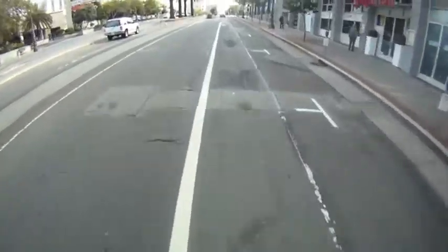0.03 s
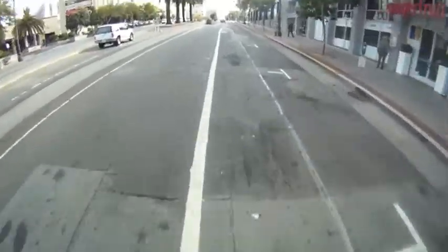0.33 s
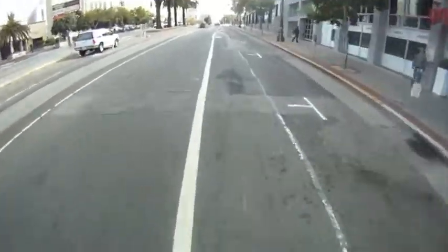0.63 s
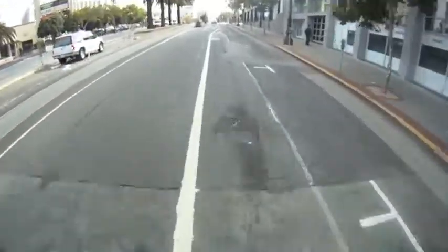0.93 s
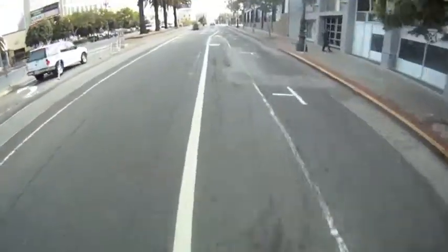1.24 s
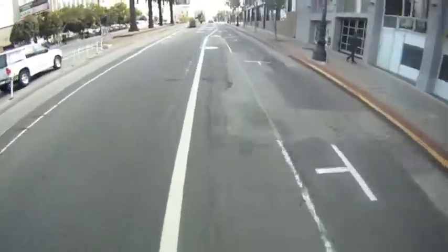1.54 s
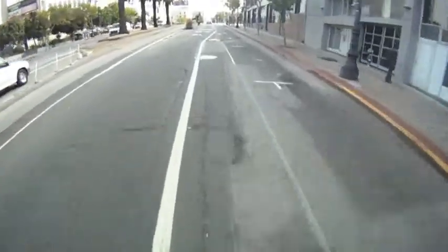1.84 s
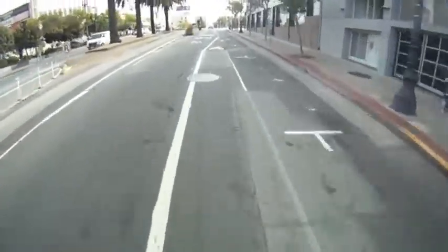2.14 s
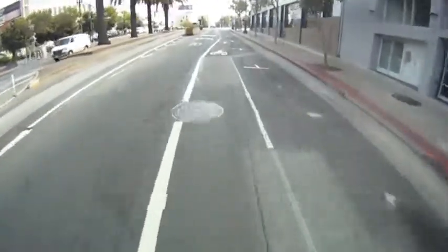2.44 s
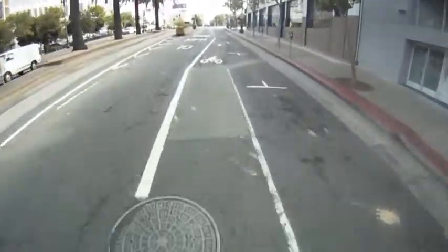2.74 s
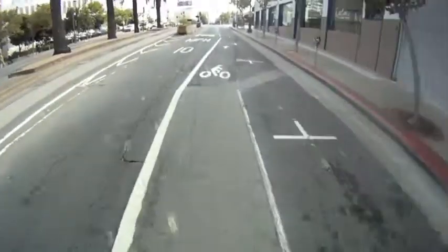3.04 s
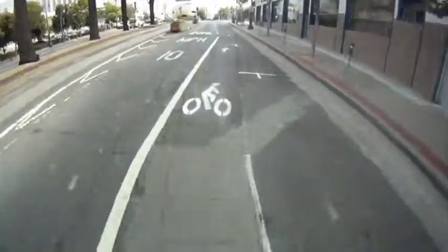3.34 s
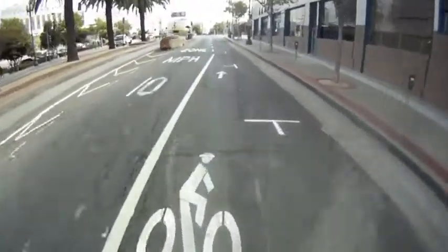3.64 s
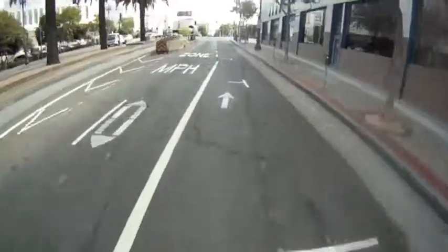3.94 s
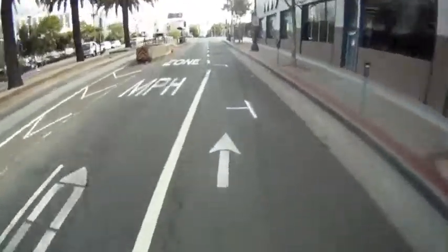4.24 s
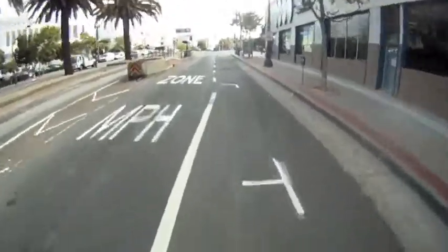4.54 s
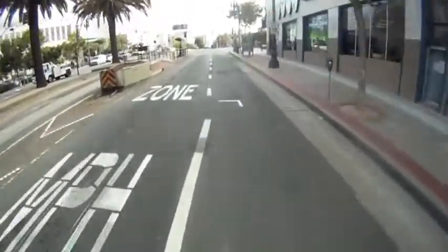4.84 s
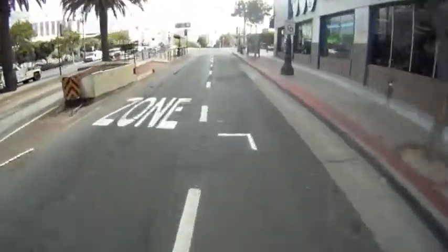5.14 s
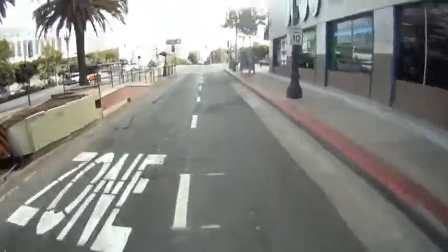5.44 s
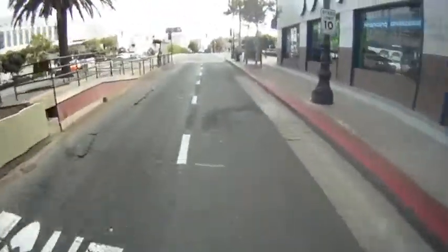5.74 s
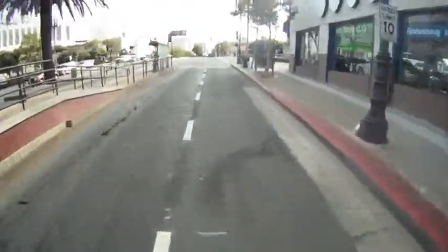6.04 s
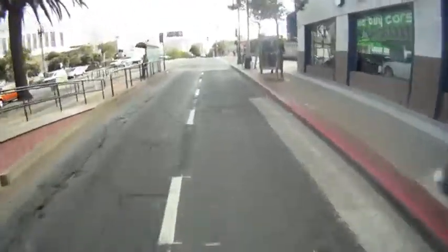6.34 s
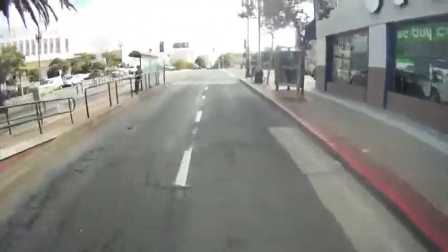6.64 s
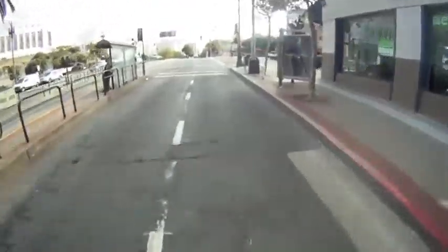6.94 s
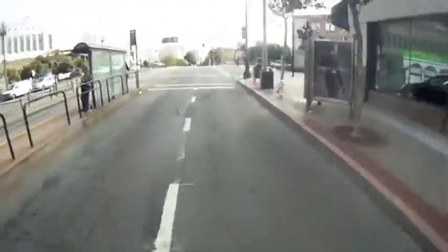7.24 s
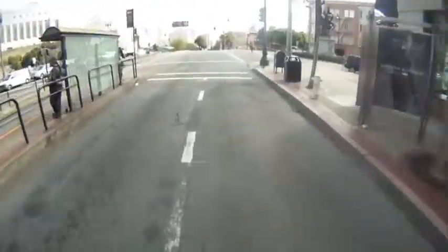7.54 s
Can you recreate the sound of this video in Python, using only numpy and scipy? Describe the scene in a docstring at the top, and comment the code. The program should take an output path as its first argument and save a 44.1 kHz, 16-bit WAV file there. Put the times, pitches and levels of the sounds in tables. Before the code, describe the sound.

Tyres on asphalt and rushing air sound boxy through a microphone enclosed on a bicycle's handlebar. The mount trembles with a deep rumble, and the uneven street keeps rocking it with low thumps, rattles and the odd tick of a loose part. In the second half, clusters of hard clacks ring the housing while the rolling noise gradually softens. Four hard jolts, one early and three later, each give a dull pop and short buzz on the right.

```python
"""A bicycle rolls down a city street with a camera in a closed housing on its handlebar.
From the start, tyre and air noise come through the housing while the mount trembles.
Bumps soon rock the mount with low thumps and rattles; at 0.8 s a hard one pops and buzzes on the right,
and a loose part ticks. From 3.9 s the mount also knocks against its stop, and two more hard jolts follow.
The tyre noise eases as the bicycle slows, and a last jolt comes at 7.3 s."""
import sys
import numpy as np
from scipy.fft import rfft, irfft, next_fast_len
from scipy.io import wavfile
from scipy.ndimage import map_coordinates

SR = 44100
rng = np.random.default_rng(int(sys.argv[2]) if len(sys.argv) > 2 else 0)


def master_out(mix):
    """Clip the mix to full scale and print it as 16-bit PCM to the path in sys.argv[1]."""
    frames = np.transpose(np.atleast_2d(mix))
    ceiling = np.clip(frames, -1, 1)
    pcm = np.round(ceiling * 32767).astype(np.int16)
    wavfile.write(sys.argv[1], SR, pcm)


N = 334278


def amp(db):
    """Turn decibels into a factor to multiply by."""
    return 10 ** (np.asarray(db) / 20)


def unit(x):
    """Scale a sound to an average (rms) level of 1."""
    return x / np.sqrt(np.mean(x ** 2) + 1e-20)


def curve(rows):
    """Join (time, value) points with straight lines, one value per sample."""
    return np.interp(np.arange(N) / SR, *np.transpose(rows))


def wobble(rate):
    """A smooth random curve through `rate` points a second."""
    return map_coordinates(rng.standard_normal(int(N * rate / SR) + 4), [np.arange(N) * rate / SR])


def filtered(x, response):
    """Multiply each frequency f in a sound by response(f)."""
    size = x.shape[-1]
    padded = next_fast_len(size + 8192)
    return irfft(rfft(x, padded) * response(np.fft.rfftfreq(padded, 1 / SR)), padded)[..., :size]


def coloured(x, spectrum):
    """Shape a sound's tone by (frequency, level) points, then scale it to level 1."""
    hz, db = np.transpose(spectrum)
    return unit(filtered(x, lambda f: amp(np.interp(np.log(f + 1), np.log(hz), db, right=-120))))


def resonance(f, hz, width):
    """How a part that rings at `hz` responds to frequency f."""
    return 1j * f * width / (hz * hz - f * f + 1j * f * width)


def add(track, s, sound):
    """Mix a sound into the track, starting at s seconds."""
    part = track[round(s * SR):]
    part[:len(sound)] += sound[:len(part)]


# How loud the tyres are along the ride: t/s, level/dB (relative)
TYRE_LOUDNESS = [(0.0, -45), (0.44, -44), (1.24, -44), (1.58, -45.5), (2.07, -44), (2.72, -44.5),
                 (3.14, -48.5), (3.88, -46.5), (4.79, -48.5), (5.53, -47), (5.74, -50.5), (6.27, -48.5),
                 (6.9, -53), (7.58, -54)]
# The tone of the tyres inside the housing: f/Hz, level/dB (relative)
TYRE_TONE = [(150, -19), (250, -12), (555, -15.5), (669, -4), (816, -4.5), (970, -1), (1050, -3.5),
             (1180, 0), (1350, -6.5), (2040, 1), (2970, -15.5), (3520, -16), (4250, -26.5), (5120, -26.5),
             (6000, -51.5), (7800, -94), (13200, -120)]
# High pitches at which the road's hiss rings the housing: f/Hz, width/Hz, level/dB (relative)
FIZZ_RINGS = [(7090, 1020, -16.5), (8550, 1300, -12.5), (9300, 700, -12), (9950, 690, -1),
              (10840, 440, -6.5), (13100, 480, -7.5), (14140, 780, -4.5), (15150, 300, -17)]

def tyres(body_db=-0.58, fizz_db=-13, ring_db=-10, flutter_db=0.9, patch_db=1.02, air_db=-58):
    """Grainy asphalt shakes frame and housing; steady air noise stays as the bicycle slows."""
    def fizz_response(f):
        rings = [amp(db) * np.abs(resonance(f, hz, width)) ** 2 for hz, width, db in FIZZ_RINGS]
        return np.linalg.norm(rings, axis=0)

    grain = unit(rng.standard_normal(N) * amp(0.83 * wobble(900)))  # tiny contacts of uneven size
    ring = unit(filtered(rng.standard_normal(N), lambda f: resonance(f, hz=1201, width=128) ** 2))
    body = coloured(grain, TYRE_TONE) + amp(ring_db) * ring
    fizz = unit(filtered(grain, fizz_response))
    surface_db = curve(TYRE_LOUDNESS) + flutter_db * wobble(45) + patch_db * wobble(10)
    loudness = np.hypot(amp(surface_db), amp(air_db))
    return loudness * (amp(body_db) * body + amp(fizz_db) * fizz)


# When the mount trembles more or less: t/s, level/dB (before its ups and downs are shrunk)
TREMBLE_LOUDNESS = [(0.0, -48.5), (3.74, -46), (4.24, -38), (5.25, -57.5), (5.57, -43.5), (6.38, -58),
                    (7.24, -43), (7.58, -41)]
# The deep tone of the trembling: f/Hz, level/dB (relative)
TREMBLE_TONE = [(10, -3.5), (20, -0.5), (35, -7), (55, -15), (100, -21.5), (200, -27), (300, -29),
                (450, -37), (600, -36.5), (1200, -82)]

def trembling(gain_db=3.5, follow=0.3, gust_db=1.9):
    """Wind and small ripples in the road keep the mount trembling."""
    shake_db = curve(TREMBLE_LOUDNESS)
    evened_db = shake_db.mean() + follow * (shake_db - shake_db.mean())
    loudness = amp(evened_db + gain_db + gust_db * wobble(12))
    return loudness * coloured(rng.standard_normal(N), TREMBLE_TONE)


def hiss(level_db=-80):
    """Left and right each have a very faint hiss of their own."""
    tone = [(60, -23), (400, 12.5), (600, 10), (800, -21), (3200, -35), (4200, 17.5),
            (8000, -7), (9000, -28)]  # f/Hz, level/dB (relative)
    return amp(level_db) * coloured(rng.standard_normal((2, N)), tone)


def ripples(over_tyres_db=8, spread_db=0.5, count=26):
    """Slight bumps come at random and soften as the bicycle slows; gives (time, level) rows."""
    place, size = rng.random((count, 2)).T
    times = .15 + (np.arange(count) + place) / count * (N / SR - .2)
    tyre_db = np.interp(times, *np.transpose(TYRE_LOUDNESS))
    return list(zip(times, tyre_db + over_tyres_db + spread_db * (2 * size - 1)))


def swell(t, rise_s, fall_s):
    """A smooth rise to 1 at t = 0, then a smooth fall."""
    return np.exp(-(t / np.where(t < 0, rise_s, fall_s)) ** 2)


# Bumps in the road that rock the mount: t/s, level/dB (relative)
ROAD_BUMPS = [(.343, -26), (.475, -29), (.797, -16), (.925, -27), (1.301, -27), (1.527, -27.5),
              (2.192, -19.5), (2.488, -31), (2.812, -28.5), (3.197, -29.5), (3.463, -23), (3.675, -33),
              (3.944, -21), (4.052, -21.5), (4.146, -28), (4.232, -30), (4.353, -15), (4.554, -23),
              (4.697, -16), (5.436, -26.5), (5.52, -34.5), (5.662, -21.5), (6.013, -33), (6.341, -34),
              (6.828, -25), (6.93, -31.5), (7.113, -26), (7.184, -32.5), (7.288, -15.5), (7.463, -24.5)]

def thumps(swing_hz=17, snap_s=0.004, snap_radians=0.72, build_s=0.026, settle_s=.017, gain_db=1.43):
    """Each bump rocks the mount gently, then builds a slow swing that snaps back."""
    out, t = np.zeros(N), np.arange(-SR // 8, SR // 10) / SR
    for s, db in ROAD_BUMPS + ripples():
        speed = amp(db + 28) ** 0.1  # harder bumps swing and snap faster
        phase = 2 * np.pi * swing_hz * speed * t + snap_radians * np.tanh(t * speed / snap_s)
        gentle_start = swell(t, rise_s=0.057, fall_s=settle_s)
        reach = 0.8 * swell(t, build_s, settle_s) + 0.2 * gentle_start
        add(out, s + t[0], -amp(db + gain_db) * reach * np.sin(phase))
    return out


def whistle(swing, pitch_hz=12000, gain_db=-42):
    """A thin high tone sounds on the back swing of every thump."""
    tone = np.sin(2 * np.pi * pitch_hz * np.arange(N) / SR + wobble(150))
    return amp(gain_db) * np.maximum(-swing, 0) * tone


# Pitches at which the housing rings when struck: f/Hz, width/Hz, level/dB (relative)
HOUSING_RINGS = [(1020, 450, 2), (1187, 310, 4.5), (1930, 494, 12), (2127, 193, 7.5), (3060, 100, -52),
                 (3650, 343, 3), (4920, 350, -44), (7200, 200, -32), (8340, 400, -4), (9900, 720, -1.5),
                 (10800, 300, -28), (14300, 300, -31), (14000, 600, -3.5), (15100, 300, -30)]

def housing(contacts, bright_db):
    """Contacts make the housing ring; sharper ones bring out its higher pitches."""
    def response(f):
        rings = sum(amp(db) * resonance(f, hz, width) ** 2 for hz, width, db in HOUSING_RINGS)
        octaves = np.log2(np.clip(f, 600, 4200) / 2000)
        return rings * amp(bright_db * octaves)

    return filtered(contacts, response)


# Stretches of rough asphalt: t/s, level/dB, half length/s
ROUGH_PATCHES = [(1.889, -47.5, 0.068), (2.156, -41.5, .055), (4.275, -46, 0.042), (5.39, -46, 0.024),
                 (5.576, -47, .03), (6.742, -46, .02), (7.204, -45.5, 0.016), (7.36, -47.5, .04)]

def chatter(level_db=-45, firm_bump_db=-21.5, lead_s=.027, rise_s=.021, fall_s=0.019):
    """Many small contacts blur into a rattle, just before each bump's swing and on rough asphalt."""
    out, t = np.zeros(N), np.arange(-SR // 10, SR // 10) / SR
    # A firm bump rattles at level_db; harder ones are louder.
    at_bumps = [(s - lead_s, level_db + 1.01 * (db - firm_bump_db), rise_s, fall_s)
                for s, db in ROAD_BUMPS]
    on_rough = [(s, db, half_s, half_s) for s, db, half_s in ROUGH_PATCHES]
    for s, db, rise, fall in at_bumps + on_rough:
        rattle = unit(housing(rng.standard_normal(len(t)), bright_db=-1.6))
        add(out, s + t[0], amp(db) * swell(t, rise, fall) * rattle)
    return out


# The hardest jolts: t/s, length/s
HARD_JOLTS = [(.7925, 0.07), (4.349, 0.11), (4.6932, .097), (7.283, .102)]

def jolts(pop_db=2.2, pop_hz=36, pop_rise_s=0.0018, pop_fade_s=0.036,
          crack_db=-45, crack_s=0.0059, crack_top_hz=4000,
          buzz_db=-41, end_hz=270, glide=.33, waver=.03, buzz_rise_s=0.044, buzz_top_hz=3500):
    """A hard jolt gives a dull pop with a thin crack, then a short buzz that sinks in pitch."""
    out = np.zeros(N)
    for s, length in HARD_JOLTS:
        t = np.arange(int(length * SR)) / SR
        pop_shape = (1 - np.exp(-t / pop_rise_s)) ** 2 * amp(pop_db - 60 * t / pop_fade_s)
        pop = -np.cos(2 * np.pi * pop_hz * t) * pop_shape
        noise = unit(filtered(rng.standard_normal(len(t)), lambda f: 1 / (1 + 1j * f / crack_top_hz)))
        crack = amp(crack_db) * noise * np.exp(-(t / crack_s) ** 2)
        pitch_hz = end_hz * (1 + glide * (1 - t / length) + waver * wobble(80)[:len(t)])
        cycles = np.cumsum(pitch_hz) / SR
        sawtooth = filtered(2 * (cycles % 1) - 1, lambda f: 1 / (1 + 1j * f / buzz_top_hz) ** 2)
        buzz = amp(buzz_db) * sawtooth * np.clip(t / buzz_rise_s - .5, 0, 1)
        add(out, s, pop + crack + buzz)
    return out


def dips(depth_db=12, fall_s=.008):
    """The level drops briefly at each hard jolt and comes back during the buzz."""
    s, length = np.transpose(HARD_JOLTS)[:, :, None]
    since = np.arange(N) / SR - s
    dip = np.clip(since / fall_s, 0, 1) * np.clip(1 - since / length, 0, 1)
    return amp(-depth_db * dip.sum(axis=0))


# Ticks of loose parts: t/s, level/dB (relative)
LOOSE_TICKS = [(.8435, -43), (4.4004, -40), (4.7566, -40), (6.5211, -40.5), (6.8395, -42), (7.3565, -38)]

def ticks(gain_db=-3, fade_s=.011):
    """Loose parts touch and give small, dry, bright ticks."""
    out, t = np.zeros(N), np.arange(SR // 30) / SR
    rings = [(3700, 830, -3.5), (4840, 710, -1.5), (6950, 1100, -4.5)]  # f/Hz, width/Hz, weight/dB
    for s, db in LOOSE_TICKS:
        contact = amp(-60 * t / fade_s) * rng.standard_normal(len(t))
        tick = filtered(contact, lambda f: sum(amp(weight) * resonance(f, hz, width)
                                               for hz, width, weight in rings) ** 2)
        add(out, s, amp(db + gain_db) * tick / np.abs(tick).max())
    return out


# Knocks of the mount: t/s, level/dB (relative), brightness/(dB per octave)
MOUNT_KNOCKS = [(3.907, -21.5, -2), (4.020, -28.5, 1.5), (4.107, -33, 1), (4.318, -20, -5),
                (4.328, -22, -0.5), (4.335, -22.5, -1), (4.6634, -20.5, -1), (5.398, -27.5, 3),
                (5.612, -25, -4), (5.639, -28, -2), (6.7985, -21, 0.5), (7.190, -31.5, -13.5),
                (7.2631, -24.5, -2), (7.270, -19, 0), (7.423, -28.5, 0.5), (7.443, -21.5, 3.5)]

def knocks(gain_db=-1.5, attack_s=0.0004, strike_fade_s=.011, rattle_db=-15, rattle_fade_s=0.015):
    """The mount strikes its stop and rattles on briefly, ringing the housing."""
    out, t = np.zeros(N), np.arange(SR // 8) / SR
    strike = amp(-60 * t / strike_fade_s)
    rattle = amp(rattle_db - 60 * t / rattle_fade_s)
    force = (strike + rattle) * (1 - np.exp(-t / attack_s))
    for s, db, bright_db in MOUNT_KNOCKS:
        ring = housing(force * rng.standard_normal(len(t)), bright_db)
        add(out, s, amp(db + gain_db) * ring / np.abs(ring).max())
    return out


def scene():
    """Left and right hear the same housing, but hard jolts pop, buzz and dip on the right alone."""
    swing = thumps()
    rocking = swing + whistle(swing)
    road = trembling() + tyres() + knocks() + chatter() + ticks()
    left = rocking + road
    right = rocking + road * dips() + jolts()
    return np.array([left, right]) + hiss()


def record(dry, top_hz=15350):
    """The camera keeps no sound higher than top_hz."""
    return filtered(dry, lambda f: f < top_hz)


dry = scene()
out = record(dry)
master_out(out)
```